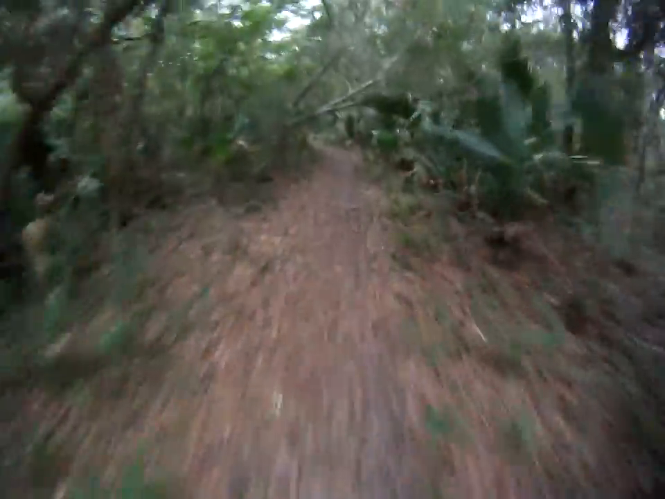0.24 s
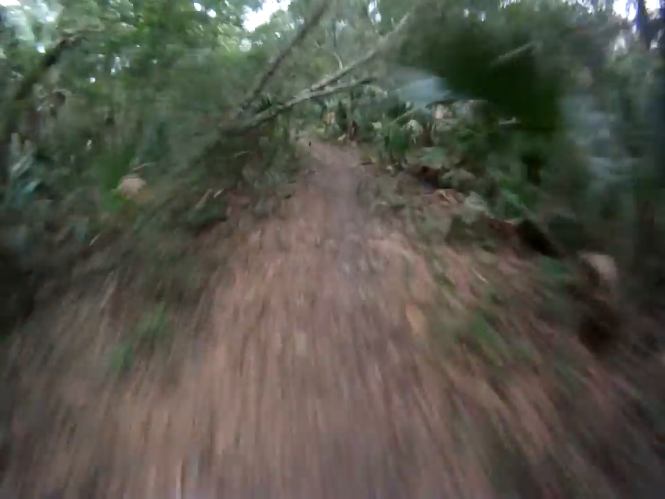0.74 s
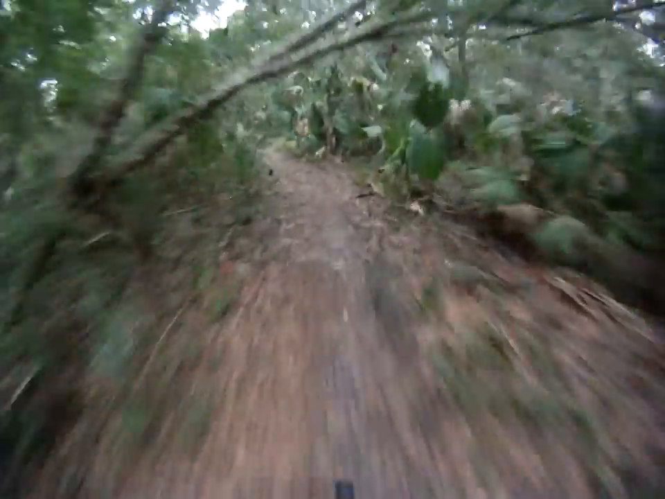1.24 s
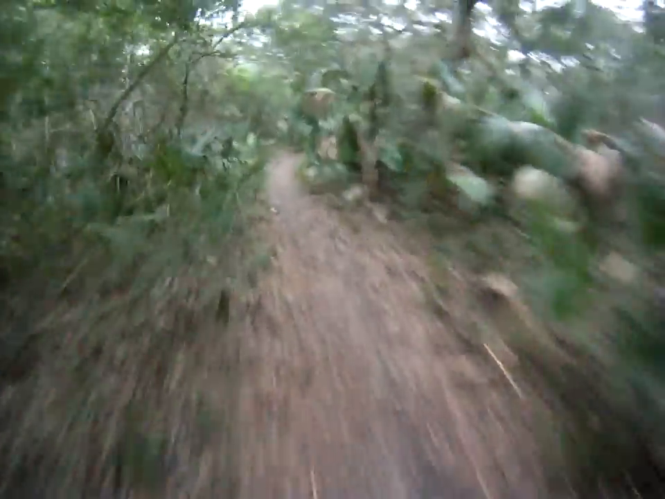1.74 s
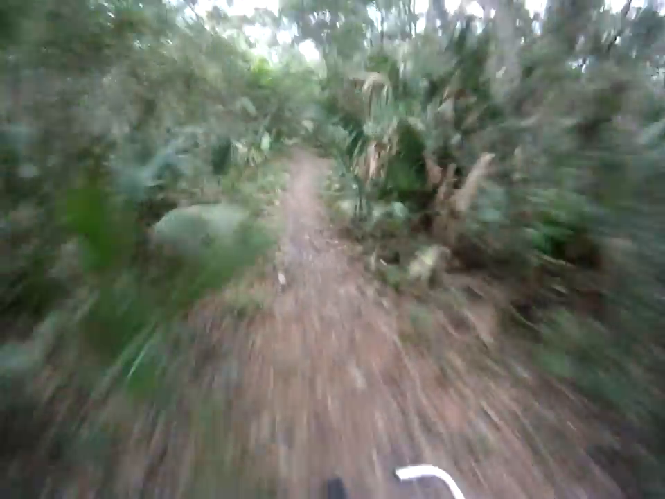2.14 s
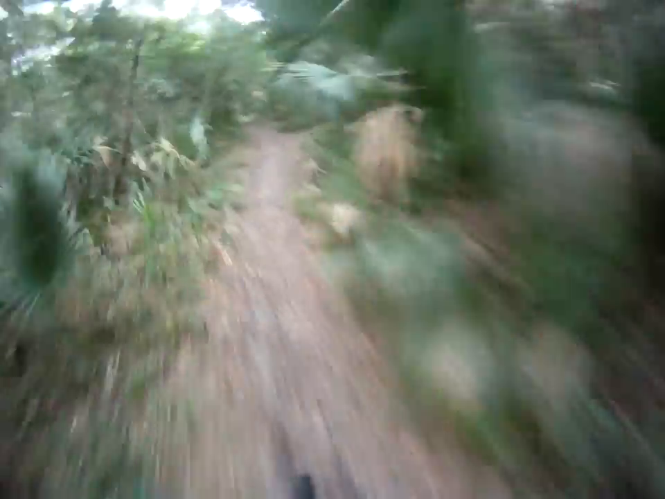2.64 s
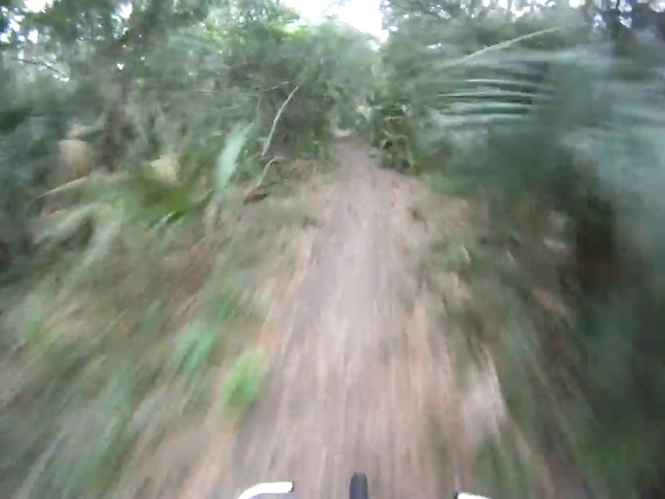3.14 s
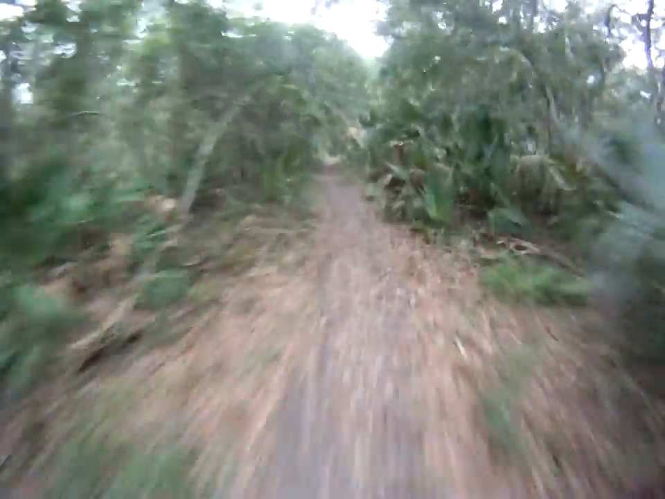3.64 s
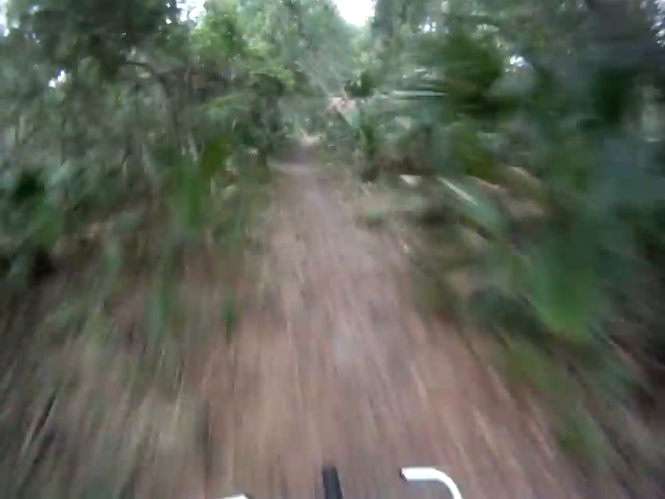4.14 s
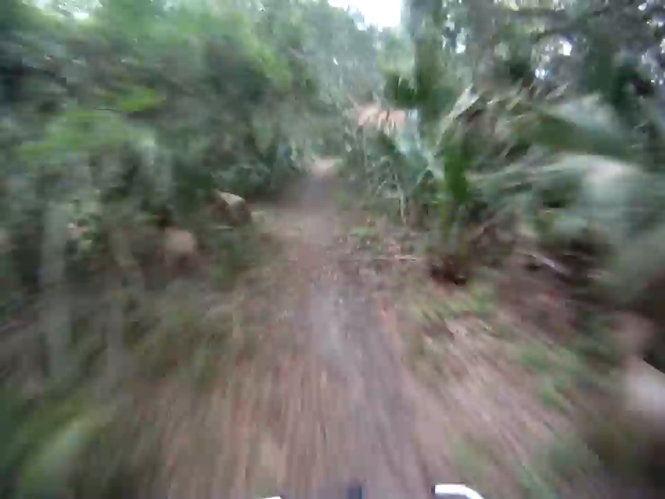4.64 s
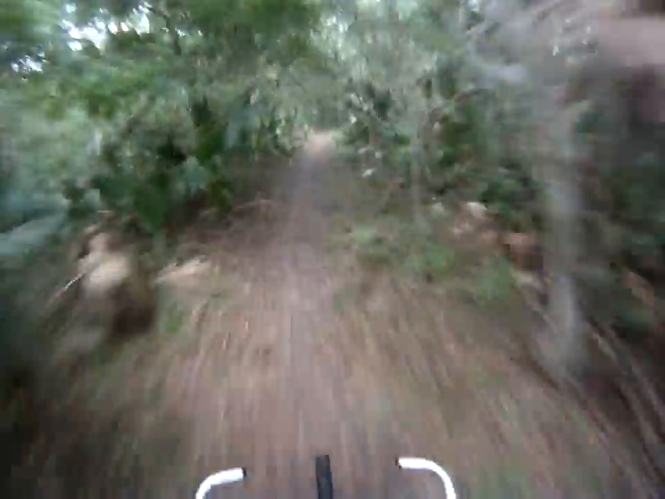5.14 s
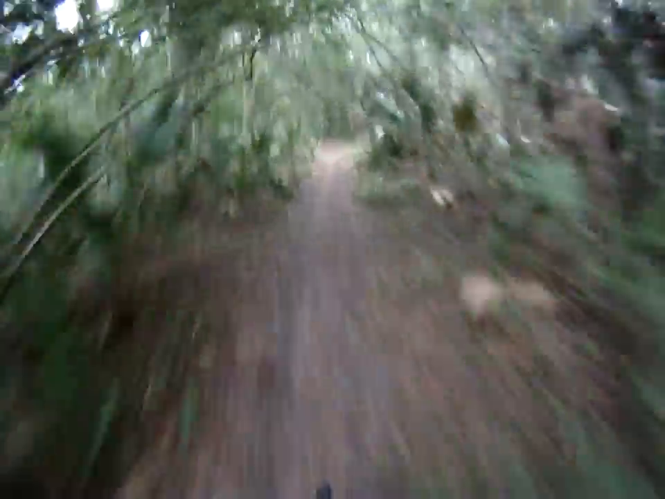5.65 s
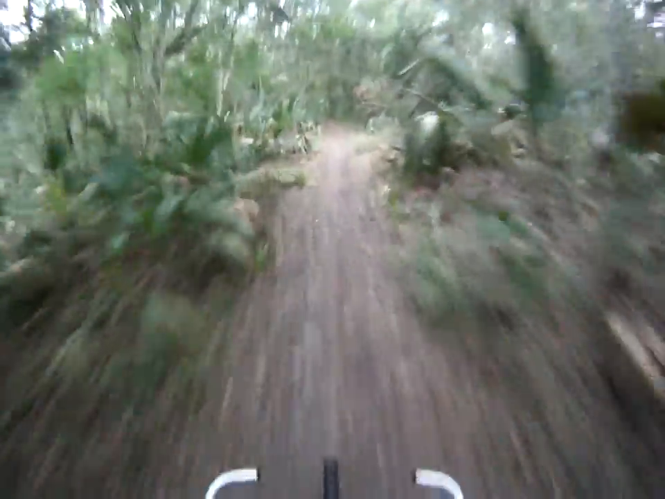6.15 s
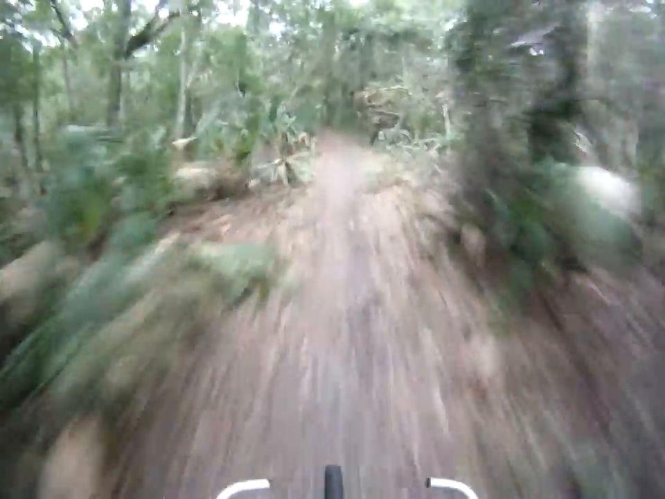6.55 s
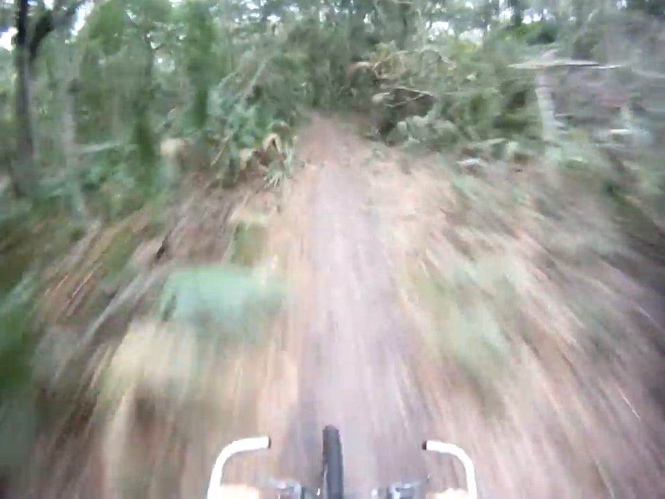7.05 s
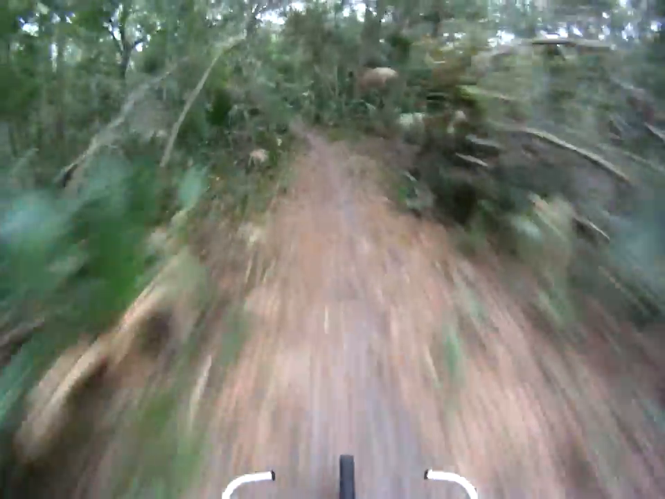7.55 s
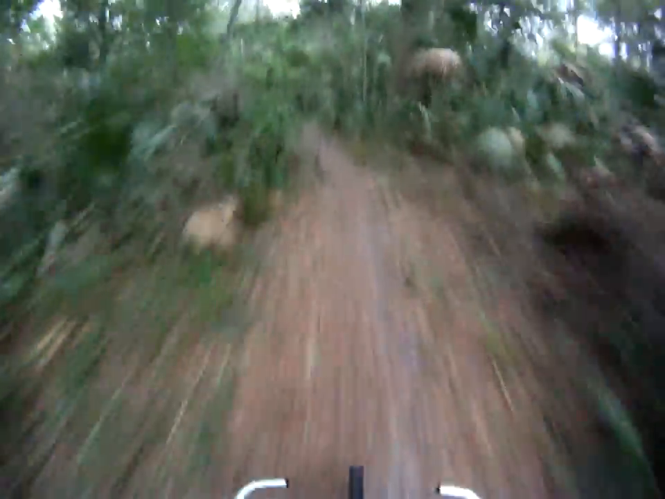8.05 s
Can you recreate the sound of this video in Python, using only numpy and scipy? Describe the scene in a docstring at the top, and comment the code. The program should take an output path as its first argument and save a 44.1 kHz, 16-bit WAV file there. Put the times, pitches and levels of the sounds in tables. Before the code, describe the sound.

Close, gritty, boxy sound from a microphone mounted on a moving bicycle. Tyres hiss steadily over soil, wind flutters low, and the frame rumbles. Scattered rattles lead to a deep bump, thin falling squeaks and one harsh crack that overloads the microphone. After a quieter, smoother moment, loose parts clatter in clusters, wind gusts swell, and late jolts thump over rising tyre noise.

```python
"""A deep sway and a clatter of loose parts open over the hiss and crunch of tyres: a mountain bike runs
fast along a dirt trail, heard by a small cased camera riding on it. Noise shaped by spectra makes tyres,
wind, frame rumble and air; decaying modes and bouncing contacts make sways, thuds, rattles and pings.
Squeaks sag in pitch, and one hard knock overloads the microphone. A limiter ducks after strong peaks,
and holding each sample at a low rate mirrors the sound into a gritty treble."""
import sys
import numpy as np
from scipy import signal
from scipy.fft import rfft, irfft
from scipy.io import wavfile
from scipy.ndimage import uniform_filter1d

SR = 44100
rng = np.random.default_rng(int(sys.argv[2]) if len(sys.argv) > 2 else 0)


def persist_wave(psi):
    """Save psi, clipped to +-1, as 16-bit WAV."""
    counts = np.round(np.clip(psi, -1, 1) * 32767).astype(np.int16)
    wavfile.write(sys.argv[1], SR, np.atleast_2d(counts).T)


N = 366471
TIME = np.arange(N) / SR  # s

# rolling noise of the tyres, which grows with speed; before the tyres' offset: t/s, level/dB
ROLLING = [(0, -49.5), (1.1, -48.5), (1.7, -50), (1.95, -45.5), (2.2, -46), (2.35, -42), (2.88, -43.5),
           (3.05, -47.5), (3.85, -49), (4.2, -45.5), (5.2, -44), (5.8, -42.5), (7, -42.5), (7.6, -41),
           (7.9, -39.5), (8.31, -39)]
# resonances of the case that colour what passes through it: f/Hz, width/Hz, boost/dB
CASE_RESONANCES = [(590, 115, 6.5), (1110, 93, 1), (1787, 54, 5.5), (2152, 340, 6.5), (3582, 204, 6.5),
                   (4844, 270, 6.5)]


def amp(db):
    """Logarithmic level: decibels become an amplitude ratio."""
    return 10 ** (np.asarray(db) / 20)


def unit(x):
    """Normalisation: scales a signal to rms 1."""
    return x / np.sqrt(np.mean(x ** 2) + 1e-20)


def curve(rows, axis=1):
    """Linear interpolation: one column of a time table at every sample."""
    rows = np.asarray(rows)
    return np.interp(TIME, rows[:, 0], rows[:, axis])


def add(mix, s, sound):
    """Superposition: adds a sound into the mix at time s."""
    part = mix[max(round(s * SR), 0):][:len(sound)]
    part += sound[:len(part)]


def response(points, modes=(), size=16384):
    """Minimum phase: a spectrum with resonant peaks fixes a causal impulse response."""
    hz = abs(np.fft.fftfreq(size, 1 / SR))
    f, db = np.transpose(points)
    db = np.interp(np.log(hz + 1), np.log(f + 1), db)
    for centre, width, boost in modes:
        db = db + boost / (1 + (2 * (hz - centre) / width) ** 2)
    # the Hilbert transform of the log magnitude gives the phase
    spectrum = np.exp(signal.hilbert(np.log(amp(db))).conj())
    return np.fft.ifft(spectrum).real[:size // 2]


def colour(x, points, modes=()):
    """Linear filtering: convolves x with the response of a spectrum and its resonances."""
    return signal.fftconvolve(x, response(points, modes))[:len(x)]


def wander(rate_hz):
    """Low-passed noise: a slow random fluctuation of rms 1."""
    hz = np.fft.rfftfreq(N, 1 / SR)
    spectrum = rfft(rng.standard_normal(N)) * np.exp(-(hz / rate_hz) ** 2)
    return unit(irfft(spectrum, N))


def tyres(level_db=0.48, grit_db=-8, grits_per_s=800, spread_db=0.5, uneven_db=0.45):
    """Shot noise: countless soil grains hiss, larger ones crunch, and loose patches flare up."""
    # source spectrum: f/Hz, relative density/dB per Hz
    tread_spectrum = [(60, -16), (200, -6.5), (320, -7), (470, -11), (750, -7), (950, -2), (1400, 0.5),
                      (1650, -1.5), (2300, -3.5), (2700, -8.5), (3200, -14.5), (3800, -18), (4300, -27),
                      (6000, -21)]
    # tyres scuffing over loose patches: t/s, level/dB, length/s
    loose_patches = [(0.012, -38.5, 0.016), (1.091, -43.5, 0.0092), (1.283, -39.5, 0.0054),
                     (2.564, -31, 0.01), (3.65, -45, 0.029), (7.97, -33.5, 0.0045)]
    sizes = amp(spread_db * np.minimum(rng.exponential(1, N), 4)) * rng.choice([-1, 1], N)
    grit = unit(sizes * (rng.random(N) < grits_per_s / SR))
    grains = rng.standard_normal(N) + amp(grit_db) * grit
    contact = unit(colour(grains, tread_spectrum, CASE_RESONANCES))
    level = amp(curve(ROLLING) + level_db + uneven_db * wander(30))
    scuff_power = np.zeros(N)
    for s, db, length in loose_patches:
        scuff_power += amp(db) ** 2 * np.exp(-(2 * (TIME - s) / length) ** 2)
    return contact * np.sqrt(level ** 2 + scuff_power)  # powers add


def wind(gusts_db=2.5, gusts_hz=7):
    """Turbulence: eddies push on the microphone as low noise of fluctuating level."""
    # source spectrum: f/Hz, relative density/dB per Hz
    eddy_spectrum = [(5, -5.5), (16, 3.5), (28, 1), (45, -13.5), (70, -9.5), (150, -59), (400, -80)]
    # strength of the wind before its fluctuation: t/s, level/dB
    breeze = [(0, -35), (1.3, -40), (2.95, -41.5), (4.2, -37.5), (5.85, -31.5), (6.3, -35.5), (7.8, -36.5),
              (8.31, -49)]
    eddies = unit(colour(rng.standard_normal(N), eddy_spectrum))
    return eddies * amp(curve(breeze) + gusts_db * wander(gusts_hz))


def frame_shake(mean_db=-44.5, follow=0.33, lumps_db=2.0, lumps_hz=8.3):
    """Random excitation: rough ground shakes the frame in lumps, harder at speed."""
    # source spectrum: f/Hz, relative density/dB per Hz
    frame_spectrum = [(30, -37), (55, 3), (72, -3), (102, 3.5), (125, -10.5), (160, -16), (220, -25),
                      (600, -70)]
    ground = rng.standard_normal(N) * amp(lumps_db * wander(lumps_hz))
    pace_db = curve(ROLLING) - curve(ROLLING).mean()
    return unit(colour(ground, frame_spectrum)) * amp(mean_db + follow * pace_db)


def rush(level_db=-56):
    """Stationary noise: a faint, even hiss of air past the case that stays when the tyres go quiet."""
    # source spectrum: f/Hz, relative density/dB per Hz
    air_spectrum = [(100, -6.5), (230, 3), (380, -0.5), (700, -7.5), (2500, -24.5), (4500, -8.5),
                    (5800, -12)]
    return amp(level_db) * unit(colour(rng.standard_normal(N), air_spectrum))


def jolts(bumps, modes, damping=2.24):
    """Transient response: each bump starts low swings that build to a widest point and die away."""
    t, out = np.arange(SR // 4) / SR, np.zeros(N)
    swing = np.zeros(len(t))
    for hz, db, rise in modes:
        envelope = (t / rise * np.exp(1 - t / rise)) ** damping  # 1 at t = rise
        swing += amp(db) * envelope * np.sin(2 * np.pi * hz * t)
    for s, db in bumps:
        add(out, s, amp(db) * swing)
    return out


def mount_sways():
    """Damped oscillation: dips in the trail set the camera mount swaying."""
    # dips: t/s, envelope peak level/dB
    dips = [(0, -12.5), (0.34, -25), (0.715, -25), (1.655, -23.5), (1.845, -21), (2.375, -25.5),
            (3.99, -27.5), (4.205, -26), (4.475, -24.5), (5.265, -18.5), (5.53, -26), (5.98, -26),
            (6.095, -26), (7.83, -23), (7.975, -14)]
    # how the mount swings: f/Hz, relative level/dB, time to the widest swing/s
    mount_modes = [(30, 0, 0.019)]
    return jolts(dips, mount_modes)


def bounces(s, db, gap, shrink=0.78, loss_db=2, rest_s=.0044):
    """Inelastic impact: each bounce is shorter and weaker, until the part lies still."""
    taps = [(s, db)]
    while gap > rest_s and len(taps) < 10:
        s, db, gap = s + gap, db - loss_db, gap * shrink
        taps.append((s, db))
    return taps


def rattles(level_db=-5.0, scrape=0.085, scrape_s=0.0049, strays_per_s=14, stray_db=-18, size=1024):
    """Impulse response: hard taps with a ragged scrape excite the case; stray ticks fall in between."""
    # a loose part thrown against its seat, before the common level offset:
    # t/s, level/dB, time to the first bounce/s (too short a time leaves a single tap)
    loose_parts = [(0.009, -25.5, 0.0076), (0.097, -34, .006), (0.155, -33, 0.0021), (0.381, -30.5, 0.0048),
                   (0.583, -36.5, 0.0076), (0.697, -34.5, 0.005), (0.918, -31.5, 0), (1.532, -27, 0.0018),
                   (1.946, -31, 0.006), (2.273, -30, 0.011), (2.312, -34, 0.0055), (2.378, -29.5, .005),
                   (2.428, -30.5, 0), (3.352, -36.5, 0), (3.551, -33, 0), (3.618, -28, 0),
                   (3.887, -32, 0.0015), (4.238, -28, 0.0052), (4.344, -30, 0.0034), (4.390, -27.5, 0.0033),
                   (4.644, -29, 0.0064), (4.843, -30.5, 0.0039), (4.924, -26, 0.0026), (4.954, -34, 0),
                   (5.200, -31, 0.013), (5.263, -27, 0.0063), (5.508, -29, 0.008), (5.556, -24.5, .007),
                   (5.636, -29, 0.0059), (5.678, -26, 0.0066), (5.787, -28, 0.007), (5.823, -26, 0.0046),
                   (6.098, -26, 0.0057), (6.187, -32, 0.0099), (6.351, -28.5, 0.0055),
                   (7.280, -27.5, 0.007), (7.389, -35, 0), (7.753, -31, 0.0086), (7.795, -28.5, 0.0071),
                   (7.891, -25.5, .008), (7.970, -26, 0.0059), (8.147, -31, 0), (8.174, -31, 0.0021)]
    # source spectrum: f/Hz, relative density/dB per Hz
    tap_spectrum = [(200, -24), (1000, -4.5), (2000, -1.5), (2900, -6), (3500, 1), (4100, -1.5), (5000, -8),
                    (5900, -6), (6600, -18)]
    t, out = np.arange(size) / SR, np.zeros(N)
    body = response(tap_spectrum, CASE_RESONANCES)[:size]
    strays = rng.uniform(-1.3, 1, N) * (rng.random(N) < strays_per_s / SR)
    for row, noises in zip(loose_parts, rng.standard_normal((len(loose_parts), 10, size))):
        for (s, db), noise in zip(bounces(*row), noises):
            contact = (t == 0) + scrape * noise * np.exp(-t / scrape_s)
            tap = signal.fftconvolve(contact, body)
            loudest = np.sqrt(uniform_filter1d(tap ** 2, size=60).max())  # short-time rms
            add(out, s, amp(db + level_db) * tap / loudest)
    ticks = signal.fftconvolve(strays, body / abs(body).max())[:N]
    return out + abs(out).max() * amp(stray_db) * ticks


def frame_thuds():
    """Modal superposition: hard bumps thud through the frame as two damped swings."""
    # hard bumps: t/s, level/dB
    hard_bumps = [(0.013, -24), (0.385, -22.5), (1.85, -31), (2.565, -12.5), (3.14, -36), (4.235, -29),
                  (5.287, -26.5), (7.46, -29.5), (7.916, -21), (7.98, -30)]
    # how the frame swings: f/Hz, relative level/dB, time to the widest swing/s
    frame_modes = [(87.6, -1, 0.011), (206, -19, 0.0037)]
    return jolts(hard_bumps, frame_modes)


def pings(pitch_hz=5600, t60=0.011, size=1024):
    """Free vibration: grit flicked against metal rings one high mode that decays 60 dB in t60."""
    # flicks of grit: t/s, peak level/dB
    flicks = [(0.301, -34), (3.026, -49), (5.768, -45)]
    t, out = np.arange(size) / SR, np.zeros(N)
    for s, db in flicks:
        add(out, s, amp(db - 60 * t / t60) * np.sin(2 * np.pi * pitch_hz * t))
    return out


def squeaks(waver=.2, waver_hz=45):
    """Frequency modulation: narrow, wavering tones swell and fade as they glide down."""
    # thin squeaks: t/s, length/s, start f/Hz, end f/Hz, rms level at mid-length before wavering/dB
    sagging_tones = [(2.438, 0.106, 2280, 2020, -46.5), (2.67, 0.19, 1830, 1760, -48),
                     (2.831, 0.137, 1795, 1634, -44.5)]
    tones = np.zeros(N, complex)
    for s, length, start_hz, end_hz, db in sagging_tones:
        u = np.arange(0, length, 1 / SR) / length
        hz = start_hz + (end_hz - start_hz) * u
        swell = amp(db) * np.sqrt(2) * np.sin(np.pi * u)
        add(tones, s, swell * np.exp(2j * np.pi * np.cumsum(hz) / SR))
    # a complex factor wavers both level and phase
    wavering = 1 + waver * (wander(waver_hz) + 1j * wander(waver_hz))
    return (tones * wavering).real


def knock(crack_db=-6, crack_s=0.0024, lowest_hz=180, size=2048):
    """Modal excitation: chattering contacts on the case crack and ring the same modes, with little bass."""
    # quick chatter of contacts: t/s, force level/dB
    contacts = [(2.78377, 2), (2.7855, 6.5), (2.7865, -5), (2.78718, -2), (2.7883, 4), (2.78983, -1)]
    # what the struck case rings with: f/Hz, relative level/dB, t60/s
    case_modes = [(345, -10, 0.0086), (1090, -17, 0.0074), (1752, -9.5, 0.017), (2195, 0, 0.0077),
                  (2600, -3, 0.01), (2930, -14, 0.015), (3580, -10, 0.02), (4020, -9.5, 0.013)]
    t, out = np.arange(size) / SR, np.zeros(N)
    ring = np.zeros(size)
    for hz, db, t60 in case_modes:
        ring += amp(db) * np.exp(-np.log(1000) * t / t60) * np.sin(2 * np.pi * hz * t)
    for (s, db), noise in zip(contacts, rng.standard_normal((len(contacts), size))):
        crack = amp(crack_db) * noise * np.exp(-t / crack_s)
        add(out, s, amp(db) * (crack - ring))
    return signal.lfilter(*signal.butter(1, lowest_hz, "high", fs=SR), out)


def scene():
    """Superposition: the pressures of all sources add at the one microphone."""
    steady = tyres() + wind() + frame_shake() + rush()
    events = mount_sways() + rattles() + frame_thuds() + pings() + squeaks() + knock()
    return (steady + events)[None]


def limiter(x, threshold_db=-13, recover_db_per_s=230, attack_s=.009):
    """Gain control: turns down within milliseconds of an overload and lets the level back up."""
    # a running maximum on a rising ramp holds each peak and lets it fall at a steady rate
    fall = TIME * recover_db_per_s
    level_db = 20 * np.log10(np.clip(abs(x), 1e-9, 1))
    peak_db = np.maximum.accumulate(level_db + fall) - fall
    excess_db = np.maximum(peak_db - threshold_db, 0)
    r = np.exp(-1 / (attack_s * SR))
    return x / amp(signal.lfilter([1 - r], [1, -r], excess_db))


def record(dry, hold_hz=12000, band_hz=5820, edge_hz=15400):
    """Sampling images: after limiter and clipping, held steps mirror the sound around the hold rate."""
    samples = np.clip(signal.resample_poly(limiter(dry[0]), hold_hz, SR), -1, 1)
    samples = signal.fftconvolve(samples, signal.firwin(41, band_hz, fs=hold_hz), "same")
    held = np.repeat(samples, 4)
    steps = signal.resample_poly(held, SR, 4 * hold_hz)[:N]
    lowpass = signal.firwin(301, edge_hz, window=("kaiser", 8), fs=SR)
    return signal.fftconvolve(steps, lowpass, "same")[None]


dry = scene()
out = record(dry)
persist_wave(out)
```